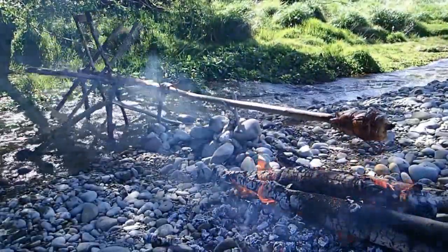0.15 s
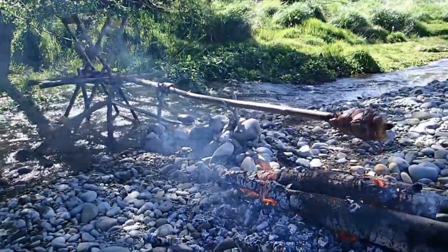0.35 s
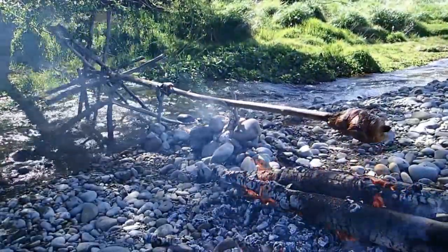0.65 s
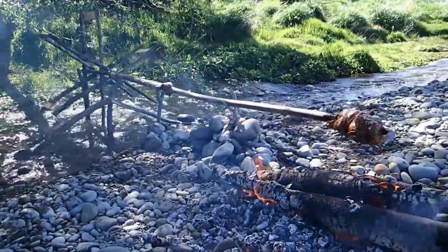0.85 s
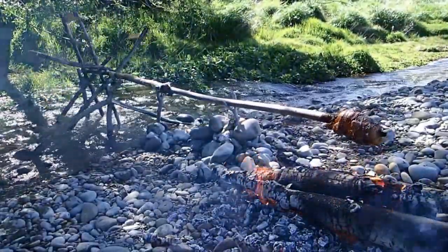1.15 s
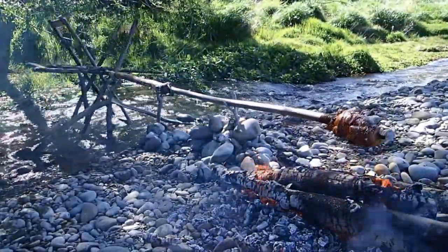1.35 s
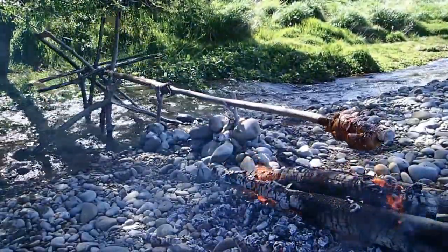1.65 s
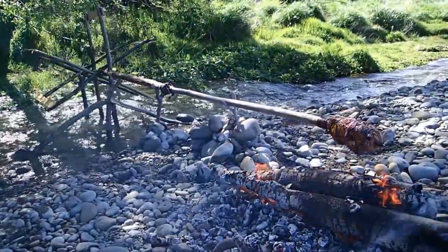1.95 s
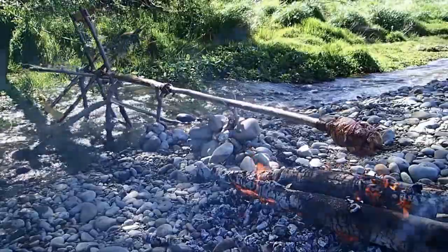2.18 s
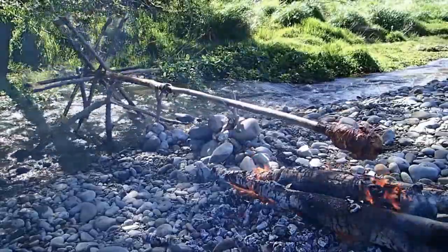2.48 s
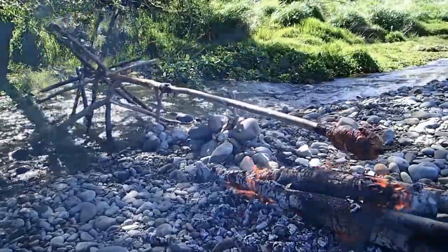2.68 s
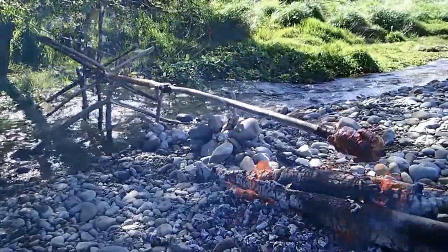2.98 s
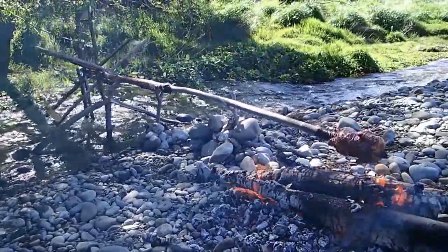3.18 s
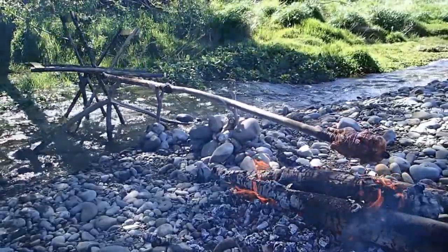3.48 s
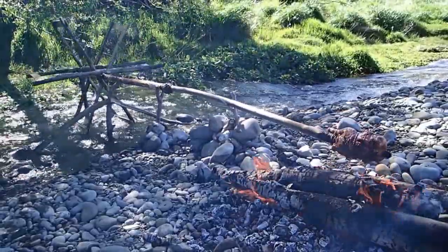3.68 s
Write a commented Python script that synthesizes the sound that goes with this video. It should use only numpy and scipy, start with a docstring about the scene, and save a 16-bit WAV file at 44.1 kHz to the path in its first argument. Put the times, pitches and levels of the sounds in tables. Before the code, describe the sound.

Steady bubbling stream water with fizzing swells and fine fire crackle; a few dry wood knocks in the first second, faint bird calls, then lively chirping near the end, picked up by a small stereo camera outdoors.

```python
"""A shallow stream rushes, fizzes and bubbles over pebbles, with a few larger gurgles: noise and rising sines.
A campfire behind it crackles (damped sines) and pops (band noise); a wooden spit knocks in its fork (modes).
Small birds sing in the trees as gliding sines, with scattered echoes; one dull push of air hits the microphone.
Two microphone ports of a small camera colour each side differently."""
import sys
import numpy as np
from scipy import signal
from scipy.fft import rfft, irfft, next_fast_len
from scipy.io import wavfile
from scipy.ndimage import uniform_filter1d, map_coordinates

SR = 44100
rng = np.random.default_rng(int(sys.argv[2]) if len(sys.argv) > 2 else 0)


def output_pcm(signal):
    """Save a mono or channel-first signal as 16-bit PCM at the path in sys.argv[1].

    Samples are clipped to [-1, 1] before scaling.
    """
    pcm = np.clip(np.atleast_2d(signal).T, -1, 1) * 32767
    wavfile.write(sys.argv[1], SR, np.round(pcm).astype(np.int16))


N = 168903


def amp(db):
    """dB to gain."""
    return 10 ** (np.asarray(db) / 20)


def unit(x):
    """Scaled to rms 1."""
    return x / np.sqrt(np.mean(x ** 2) + 1e-20)


def along(points, hz):
    """Interpolates (f/Hz, value) points on a log frequency axis."""
    f, v = np.transpose(points)
    return np.interp(np.log(hz + 1), np.log(f + 1), v)


def filtered(x, response):
    """Applies a complex response of frequency to x."""
    m = next_fast_len(N + SR // 2)
    spectrum = rfft(x, m) * response(np.fft.rfftfreq(m, 1 / SR))
    return irfft(spectrum, m)[..., :N]


def add(track, start_s, sound):
    """Mixes a sound into the track at start_s."""
    part = track[round(start_s * SR):][:len(sound)]
    part += sound[:len(part)]


THIN_HZ = 201


def thin(x):
    """Small sources radiate little bass: third-order low cut."""
    return filtered(x, lambda hz: (1j * hz / (THIN_HZ + 1j * hz)) ** 3)


def echo(x, t60_s, db):
    """A pair of scattered decaying returns, as noise tails."""
    t = np.arange(int(t60_s * SR)) / SR
    tail = rng.standard_normal((2, len(t))) * amp(-60 * t / t60_s) * (t > .002)
    tail = tail / np.linalg.norm(tail[0])
    return amp(db) * signal.fftconvolve(x[None], tail, axes=1)[:, :N]


def patchy_noise(spectrum, patchy_db):
    """A pair of unrelated noises with shared time-frequency patches of random gain."""
    z = signal.stft(rng.standard_normal((2, N)), nperseg=512)[2]
    field = uniform_filter1d(rng.standard_normal(z.shape[1:]), 16, 0)
    field = uniform_filter1d(field, 3, 1)
    pair = signal.istft(z * amp(patchy_db * unit(field)), nperseg=512)[1][:, :N]
    return unit(filtered(pair, lambda hz: amp(along(spectrum, hz))))


def grains(kind, rise):
    """Damped sines at random times, pitches and sizes; pitch climbs by the share `rise` over a life."""
    rate, pitch_hz, spread, cycles, size_db, db = kind
    z = rng.standard_normal((2000, 1))
    when = rng.random((2000, 1))
    size = np.minimum(rng.exponential(size=(2000, 1)), 3)
    z, when, size = (draw[:int(rate * N / SR)] for draw in (z, when, size))
    hz = np.clip(pitch_hz * np.exp(spread * z), pitch_hz / 2, 15000)
    k = np.arange(int(2 * cycles * SR / pitch_hz))
    life = k / SR * hz / cycles  # 1 = one life
    envelope = amp(size_db * size - 37 * life) * (1 - np.exp(-12 * life))
    sound = envelope * np.sin(2 * np.pi * cycles * (life + rise * life * life / 2))
    position = (when * N).astype(int) + k
    return amp(db) * unit(np.bincount(position.ravel(), sound.ravel(), minlength=N)[:N])


# Flow curve of the fizz, before HISS_OVER_FLOW_DB: [t/s, level/dB]
FLOW = [(0, -45), (.65, -46.5), (.95, -43), (1.3, -41.5), (1.45, -44.5), (1.7, -40), (2.1, -44.5),
        (2.6, -45), (2.95, -41), (3.83, -45.5)]


def swell_db():
    """Flow curve in dB, per sample."""
    return np.interp(np.arange(N) / SR, *np.transpose(FLOW))


# Rush and fizz spectra, shape only: [f/Hz, density/dB]
RUSH_SPECTRUM = [(30, -19.5), (173, -11.5), (270, -10.5), (520, -2.5), (694, -7.5), (809, -0.5),
                 (1440, -3.5), (3000, -8), (3900, -7), (6600, -120)]
HISS_SPECTRUM = [(1500, -33), (2500, -5.5), (3700, -2), (5000, 8), (5860, 2), (6600, -1), (9870, -13.5),
                 (11800, -10.5), (14000, -18), (15600, -24)]
# Bubble sets: [rate/(1/s), f/Hz, pitch spread/ln, life/cycles, size spread/dB, rms level/dB]
BUBBLES = [(71.4, 446, 0.28, 14.2, 1.5, -52.5), (149, 802.6, 0.395, 17, 5, -50.5),
           (450, 5000, 0.43, 7.9, 5.5, -51.5)]
# Larger bubbles: [t/s, f/Hz, level/dB]
GURGLES = [(.447, 443, -37), (.588, 343, -33.5), (.995, 380, -40), (1.411, 548, -36.5), (1.555, 289, -41),
           (2.365, 415, -39), (2.402, 464, -34), (2.44, 790, -36.5), (2.662, 504, -37.5), (2.826, 358, -34),
           (2.94, 332, -34)]
RUSH_DB, HISS_OVER_FLOW_DB = -44, 3
RUSH_FOLLOWS = 0.71  # share of the swell, in dB
BUBBLE_RISE, GURGLE_CYCLES = 0.26, 12


def stream():
    """Turbulence as noise pairs; ringing bubbles ride on both channels, gurgles on the shared one."""
    fizz_db = swell_db()
    rush_db = RUSH_FOLLOWS * (fizz_db - fizz_db.mean()) + RUSH_DB
    rush = amp(rush_db) * patchy_noise(RUSH_SPECTRUM, patchy_db=2.0)
    fizz = amp(fizz_db + HISS_OVER_FLOW_DB) * patchy_noise(HISS_SPECTRUM, patchy_db=2.5)
    drops = np.array([sum(grains(kind, BUBBLE_RISE) for kind in BUBBLES) for channel in range(2)])
    for start_s, hz, db in GURGLES:
        life = np.linspace(0, 1, int(GURGLE_CYCLES * SR / hz))
        tone = np.sin(2 * np.pi * GURGLE_CYCLES * (life + BUBBLE_RISE * life * life / 2))
        add(drops[0], start_s, amp(db) * np.sin(np.pi * life ** 0.48) * tone)
    return rush + fizz + thin(drops)


# Push of air: f/Hz, level/dB, t60/s
THUMP = (290, -23, 0.013)
THUMP_S, THUMP_ATTACK_S = 3.274, 0.00038


def puff():
    """One dull push of air on the microphone: a damped low cosine."""
    out, t = np.zeros(N), np.arange(4000) / SR
    hz, db, t60_s = THUMP
    envelope = amp(db - 60 * t / t60_s) * (1 - np.exp(-t / THUMP_ATTACK_S))
    add(out, THUMP_S, envelope * np.cos(2 * np.pi * hz * t))
    return out


# Crackle sets: [rate/(1/s), f/Hz, pitch spread/ln, life/cycles, size spread/dB, rms level/dB]
CRACKLE = [(209, 6020, 0.15, 29, 4.3, -53), (308, 8500, 0.18, 4.2, 7.3, -57)]
# Single pops: [t/s, level/dB, f/Hz]
POPS = [(.0363, -29.5, 4910), (0.0783, -29.5, 5200), (0.1753, -25.5, 5160), (.295, -30.5, 5100),
        (0.7083, -29.5, 6300), (0.839, -27, 3330), (1.177, -32, 8700), (1.523, -28.5, 6360),
        (1.5511, -27, 6000), (1.671, -24.5, 5370), (1.979, -32, 3200), (2.44, -30, 4640),
        (2.473, -34, 4870), (2.9392, -27, 5260), (3.2075, -39, 5750), (3.2595, -34, 5700)]
POP_Q, POP_T60_S, POP_ATTACK_S = 5.9, 0.029, 0.00023


def fire():
    """Fine crackle, swelling with the flow curve, and single pops that ring briefly in a band."""
    swell = amp(swell_db() - swell_db().mean())
    out = swell * sum(grains(kind, 0) for kind in CRACKLE)
    t = np.arange(1500) / SR
    for start_s, db, hz in POPS:
        noise = rng.standard_normal(len(t))
        ring = unit(signal.lfilter(*signal.iirpeak(hz, POP_Q, SR), noise))
        add(out, start_s, amp(db - 60 * t / POP_T60_S) * np.minimum(t / POP_ATTACK_S, 1) * ring)
    return out


# Slips of the pole: [t/s, ring level/dB, crack level/dB]
KNOCKS = [(.361, -34, -22.5), (.556, -33.5, -27.5), (.746, -32, -29), (.765, -38, -42),
          (.7995, -32.5, -28.5)]
# Wood modes: [f/Hz, level re ring/dB, t60/s]
SPIT_MODES = [(870, -6.5, 0.033), (1230, 7.5, 0.011), (1930, 10, 0.0041), (2470, 1.5, .015)]
SNAP_HZ, SNAP_Q, SNAP_T60_S = 5200, 3.8, 0.021  # crack of the bark


def spit():
    """Each slip of the pole rings its wood modes and cracks its bark."""
    out, t = np.zeros(N), np.arange(2500) / SR
    for start_s, ring_db, crack_db in KNOCKS:
        ring = 0
        for hz, level_db, t60_s in SPIT_MODES:
            mode_db = level_db + rng.normal(0, 1)
            ring = ring + amp(mode_db - 60 * t / t60_s) * np.sin(2 * np.pi * hz * t)
        noise = rng.standard_normal(len(t))
        crack = unit(signal.lfilter(*signal.iirpeak(SNAP_HZ, SNAP_Q, SR), noise))
        add(out, start_s, amp(ring_db) * ring + amp(crack_db - 60 * t / SNAP_T60_S) * crack)
    return out


EDGE_S = 0.0049  # longest fade
FAINT_DB = -40.5  # whistles below this flutter and blur
FLUTTER_DB, FLUTTER_HZ, BLUR_RAD = 3.5, 146, 0.7  # blur wanders at twice FLUTTER_HZ


def whistle(length_s, times_s, pitches_hz, db):
    """A sine along a pitch line, faded at both ends; faint ones waver in level and phase."""
    t = np.arange(int(length_s * SR)) / SR
    flutter, blur = (map_coordinates(rng.standard_normal(80), [t * FLUTTER_HZ * k]) * (db < FAINT_DB)
                     for k in (1, 2))
    edge = np.minimum(t, length_s - t) / min(EDGE_S, length_s / 2)
    fade = np.sin(np.pi / 2 * np.clip(edge, 0, 1)) ** 2
    phase = 2 * np.pi * np.cumsum(np.interp(t, times_s, pitches_hz)) / SR + BLUR_RAD * blur
    return amp(db + FLUTTER_DB * np.clip(flutter, -2, 1)) * fade * np.sin(phase)


# Short whistles: [t/s, length/s, start f/Hz, end f/Hz, level/dB]
NOTES = [(1.557, 0.2, 4350, 4170, -41.5), (2.258, 0.033, 2920, 3170, -42),
         (2.312, 0.0173, 3070, 4320, -31.5), (2.378, 0.031, 2970, 3310, -35),
         (2.402, 0.0079, 3520, 3650, -32), (2.515, 0.019, 3840, 3540, -32), (2.58, 0.016, 3814, 3700, -28),
         (2.646, 0.018, 4010, 3930, -28), (2.686, 0.026, 4500, 4404, -22), (3.118, 0.029, 4700, 4570, -39),
         (3.188, 0.031, 7700, 6800, -42), (3.222, 0.04, 6290, 6140, -39.5), (3.225, .01, 5320, 4960, -28.5),
         (3.296, 0.02, 4810, 4540, -30), (3.326, 0.036, 6900, 7060, -41.5),
         (3.357, 0.0035, 5120, 4540, -19.5), (3.361, 0.014, 7450, 6700, -38.5),
         (3.381, 0.015, 4380, 4520, -33), (3.384, 0.088, 3500, 3900, -48.5), (3.432, .021, 5220, 4220, -31),
         (3.473, 0.0044, 5700, 5100, -20), (3.478, 0.059, 6120, 6350, -41.5),
         (3.515, 0.015, 4330, 4420, -35.5), (3.519, 0.032, 6540, 6700, -39),
         (3.562, 0.025, 4900, 4820, -37), (3.571, 0.0098, 4520, 4320, -27.5),
         (3.582, .015, 3700, 3850, -38), (3.593, 0.063, 7800, 7600, -46.5), (3.591, 0.072, 6410, 6370, -42),
         (3.649, 0.013, 4220, 4430, -34), (3.698, 0.011, 5100, 4030, -26), (3.703, 0.042, 3720, 3530, -40),
         (3.775, 0.016, 4120, 4430, -33.5), (3.795, 0.014, 5800, 4060, -27), (3.823, .015, 5000, 4700, -25)]
# Soft far calls: [t/s, rise/s, length/s, level/dB]
FAR_CALLS = [(0.782, 0.059, 0.177, -43), (1.015, 0.0364, 0.13, -42)]
# Long rising whistle: [t/s, f/Hz, level/dB]
TRILL = [(2.724, 4940, -58.5), (2.733, 4900, -19.5), (2.754, 4790, -22.5), (2.8, 5076, -21),
         (2.826, 5155, -20.5), (2.842, 5234, -29), (2.859, 5300, -25), (2.892, 5540, -28),
         (2.92, 5840, -56)]
CALL_DROP_S = 0.0224


def birds():
    """Gliding sines: short whistles, far calls that rise, drop and trail off, one long rising whistle."""
    out = np.zeros(N)
    for start_s, length_s, start_hz, end_hz, db in NOTES:
        add(out, start_s, whistle(length_s, [0, length_s], [start_hz, end_hz], db))
    call_hz = (2400, 3012, 2635, 2577)  # start, top, after the drop, end
    for start_s, rise_s, length_s, db in FAR_CALLS:
        add(out, start_s, whistle(length_s, [0, rise_s, rise_s + CALL_DROP_S, length_s], call_hz, db))
    times_s, hz, db = np.transpose(TRILL)
    t = np.arange(times_s[0], times_s[-1], 1 / SR)
    phase = 2 * np.pi * np.cumsum(np.interp(t, times_s, hz)) / SR
    add(out, times_s[0], amp(np.interp(t, times_s, db)) * np.sin(phase))
    return out


# Left-right likeness of stream and echoes: [f/Hz, correlation]
ALIKE = [(100, 0.33), (270, 0.71), (800, 1), (3100, 0.88), (6800, 0.46), (15000, 0.052)]
TREES_T60_S, TREES_DB, NEAR_T60_S, NEAR_DB = 0.53, -7, 0.1, -9


def scene():
    """Weights a shared and a differing channel by likeness, then spreads them onto left and right."""
    near = thin(fire() + spit())
    song = birds()
    pair = stream() + echo(near, NEAR_T60_S, NEAR_DB) + echo(song, TREES_T60_S, TREES_DB)

    def weights(hz):
        angle = np.arccos(np.clip(along(ALIKE, hz), 0, 1)) / 2
        return np.array([np.cos(angle), np.sin(angle)])

    shared, apart = filtered(pair, weights)
    shared = shared + near + song + puff()
    return np.array([shared + apart, shared - apart])


# Port level: [f/Hz, left over right/dB]
LEAN = [(200, 3), (2700, 5.5), (3700, 8), (4350, 11.5), (5100, -4.5), (5700, 3), (7000, 13), (9500, -0.5),
        (12500, -5.5)]
# Port phase: [f/Hz, left lead/rad]
LEAD = [(3790, -0.21), (4740, 0.2), (5510, 1), (6980, -1.16), (9820, -2.4), (11800, -1.6), (13800, 2)]
NOTCH_HZ, NOTCH_WIDTH_HZ, NOTCH_DB = 4047, 200, -7  # dip made by the camera body
BASS_CUT_HZ, TOP_HZ = 60, 15795


def record(dry):
    """Ports differ in level and phase; both share a dip, a bass cut and a band limit."""
    def ports(hz):
        half = amp(along(LEAN, hz) / 2) * np.exp(.5j * along(LEAD, hz))
        dip = amp(NOTCH_DB * np.exp(-((hz - NOTCH_HZ) / NOTCH_WIDTH_HZ) ** 2))
        bass_cut = (1j * hz / (BASS_CUT_HZ + 1j * hz)) ** 2
        return np.array([half, 1 / half]) * dip * bass_cut * (hz < TOP_HZ)

    return filtered(dry, ports)


dry = scene()
out = record(dry)
output_pcm(out)
```